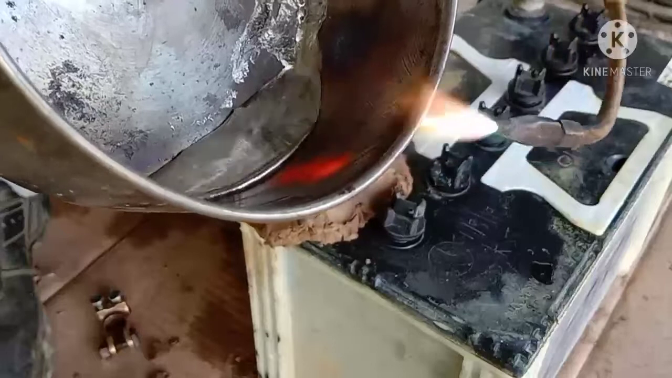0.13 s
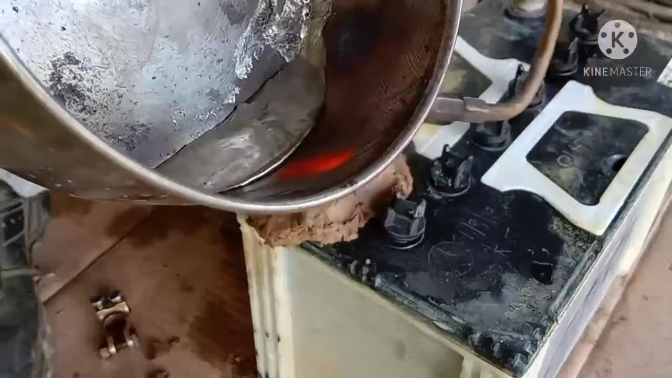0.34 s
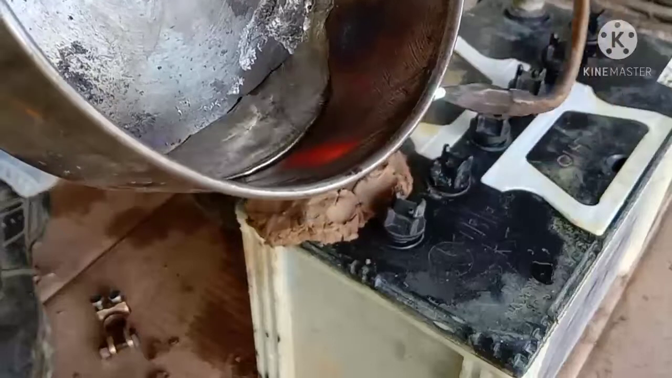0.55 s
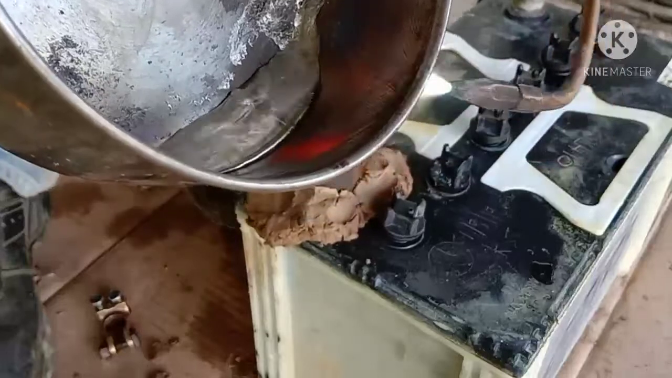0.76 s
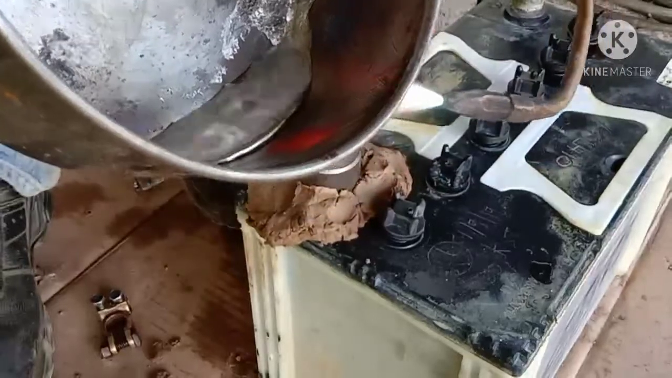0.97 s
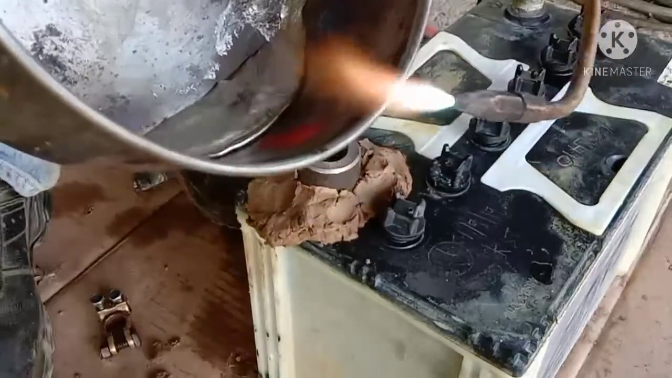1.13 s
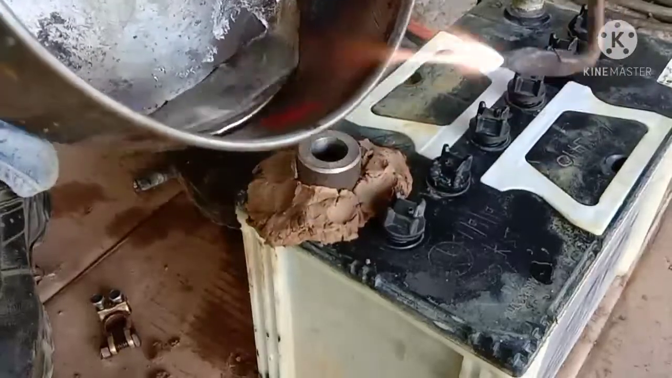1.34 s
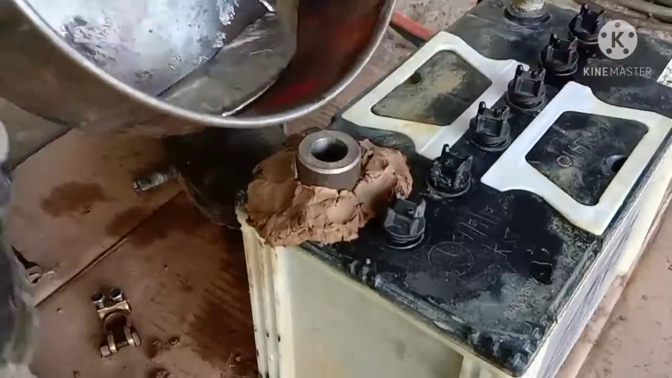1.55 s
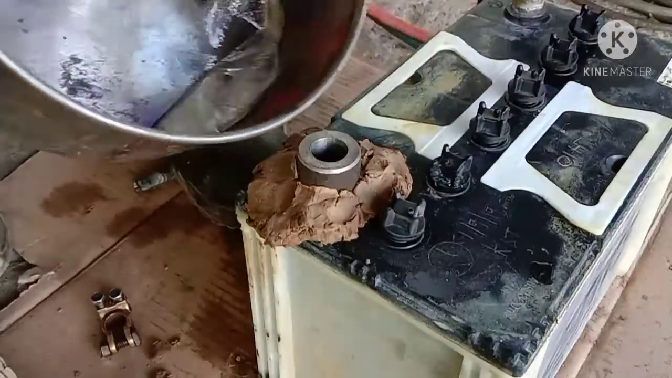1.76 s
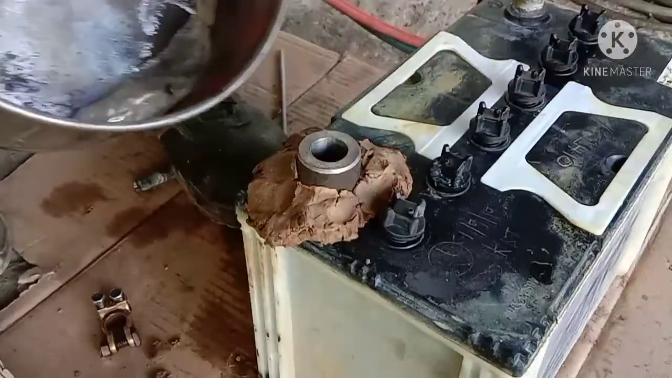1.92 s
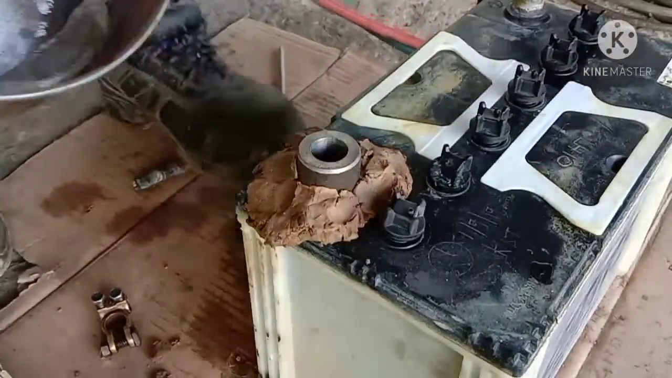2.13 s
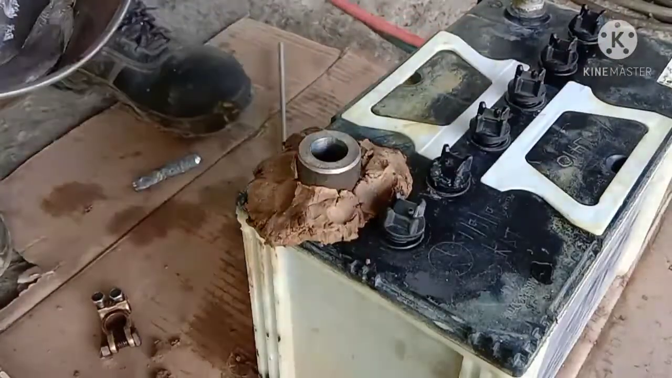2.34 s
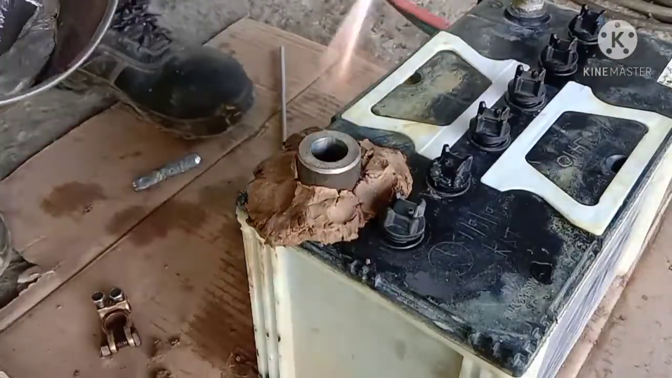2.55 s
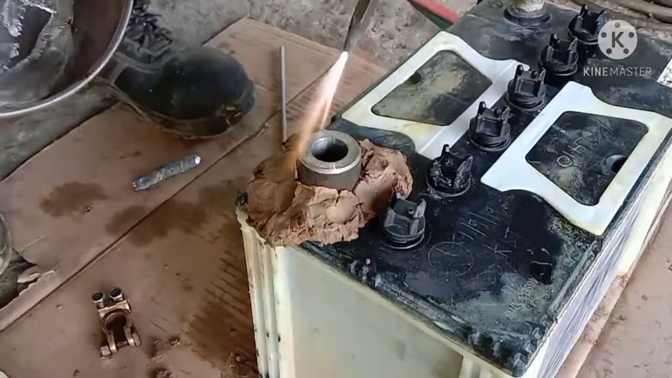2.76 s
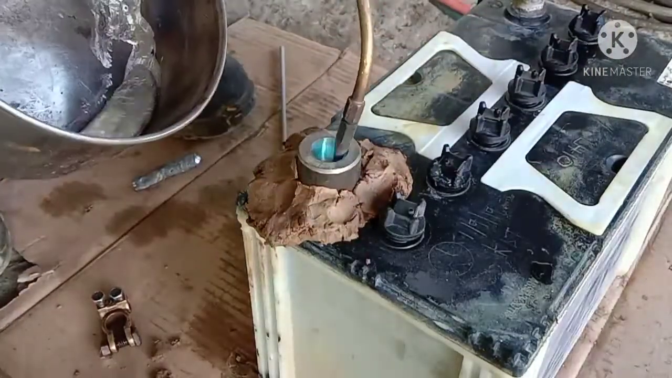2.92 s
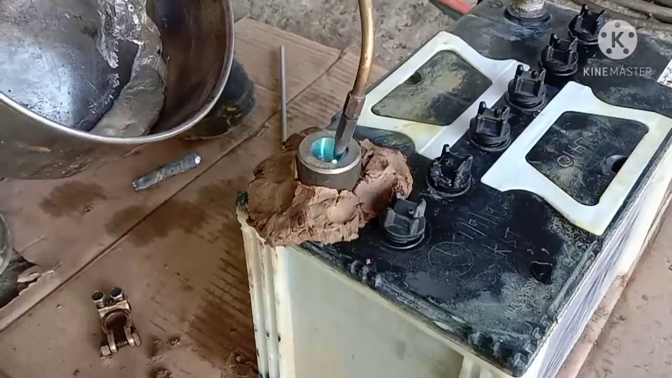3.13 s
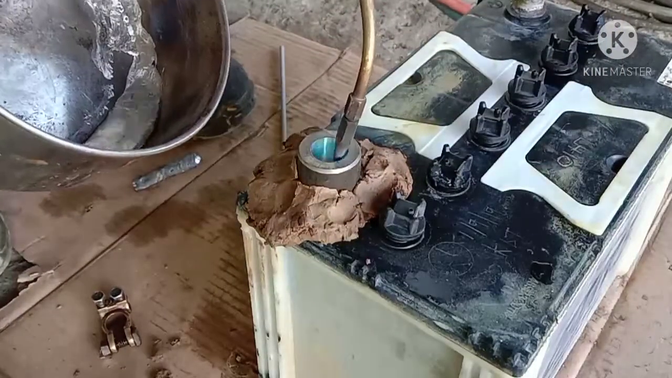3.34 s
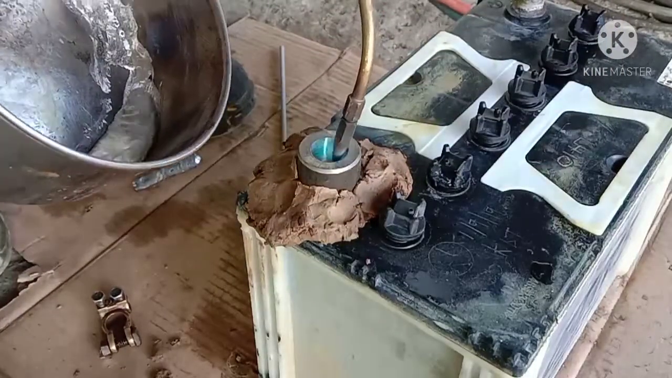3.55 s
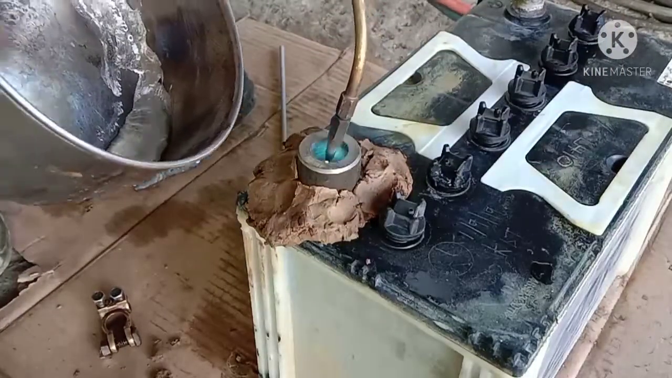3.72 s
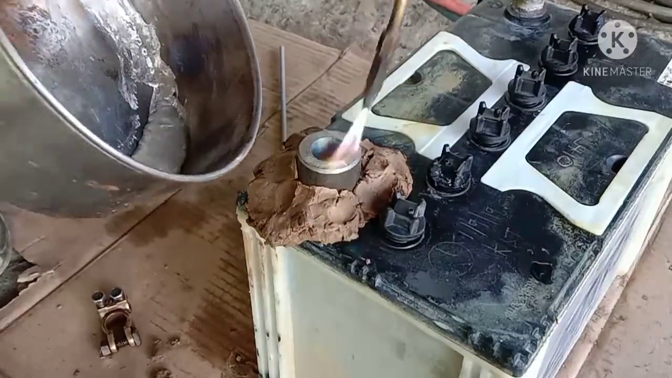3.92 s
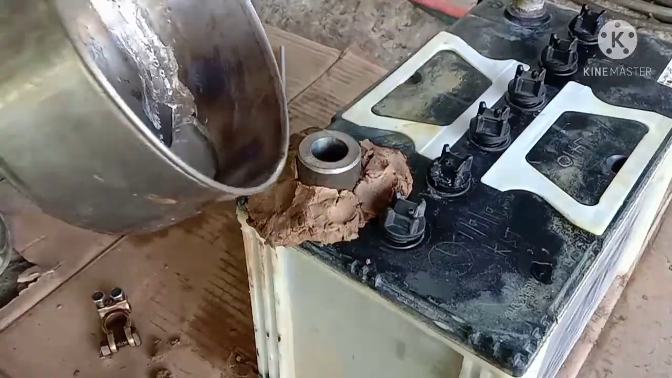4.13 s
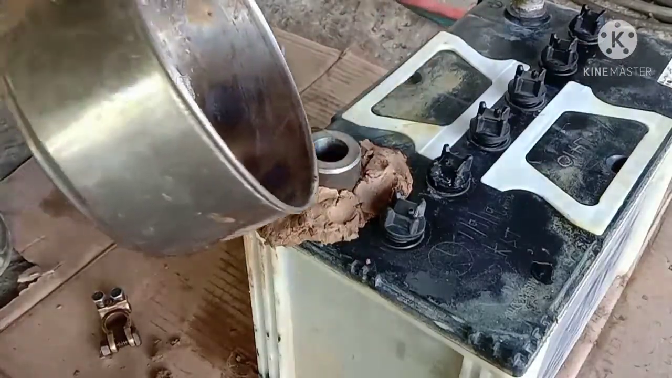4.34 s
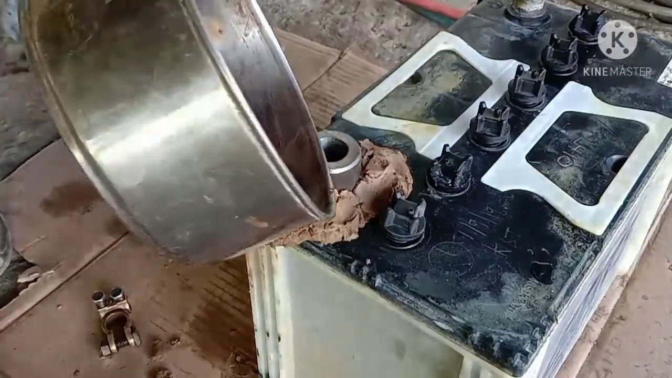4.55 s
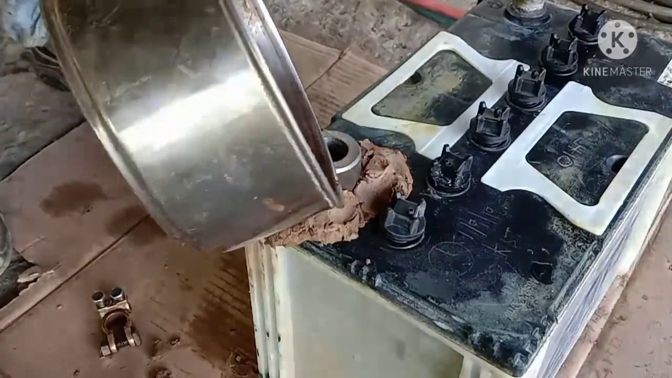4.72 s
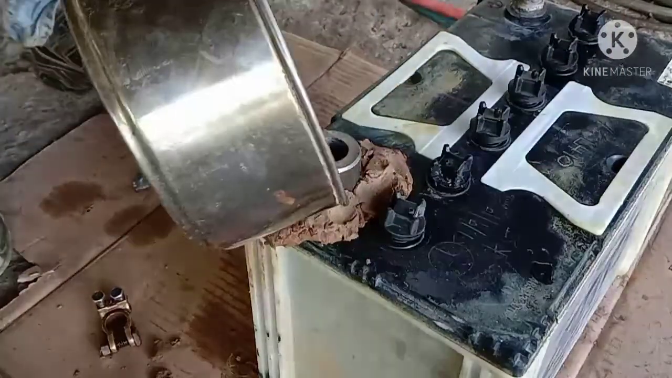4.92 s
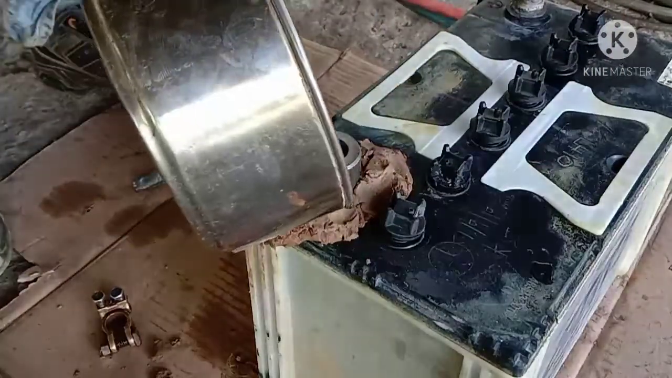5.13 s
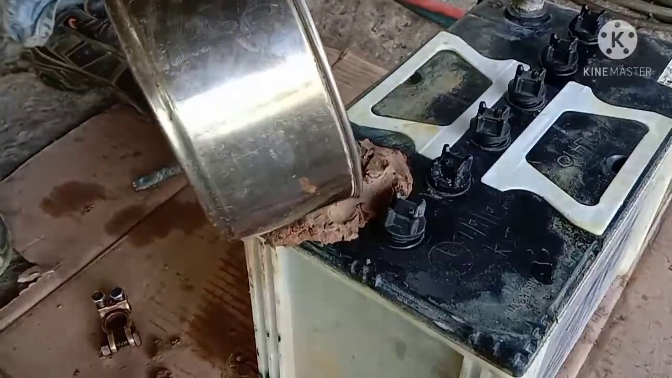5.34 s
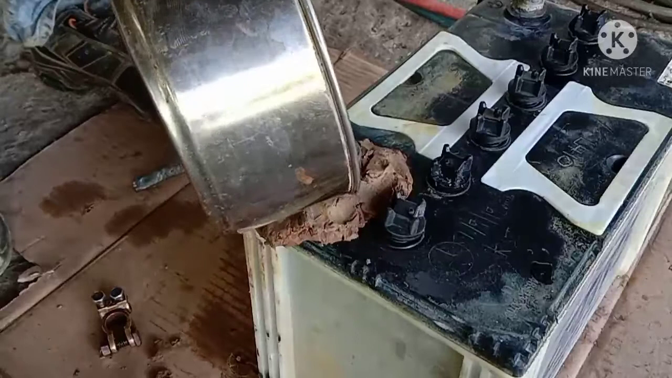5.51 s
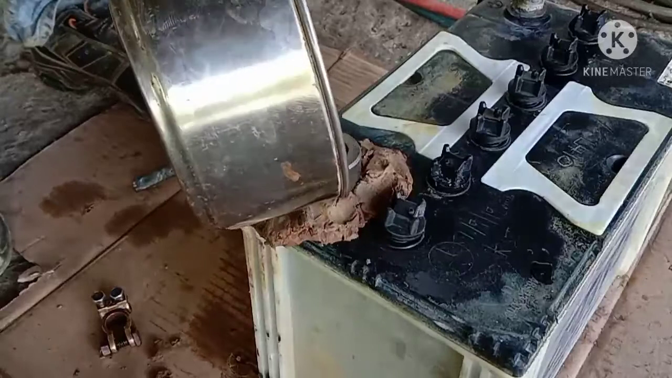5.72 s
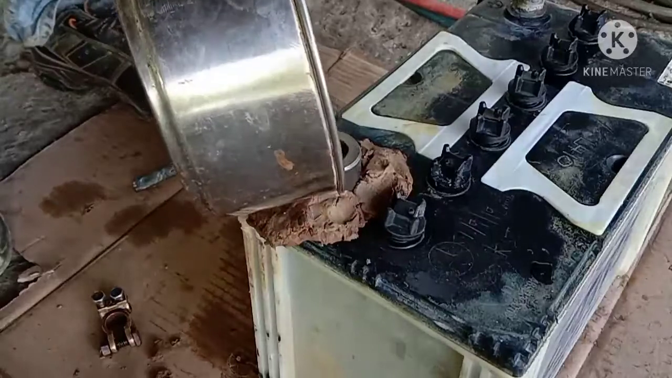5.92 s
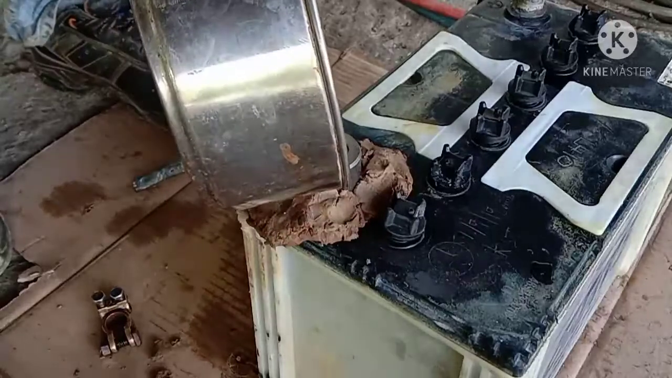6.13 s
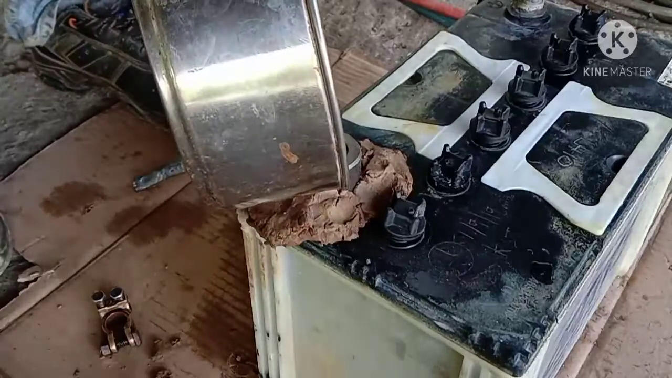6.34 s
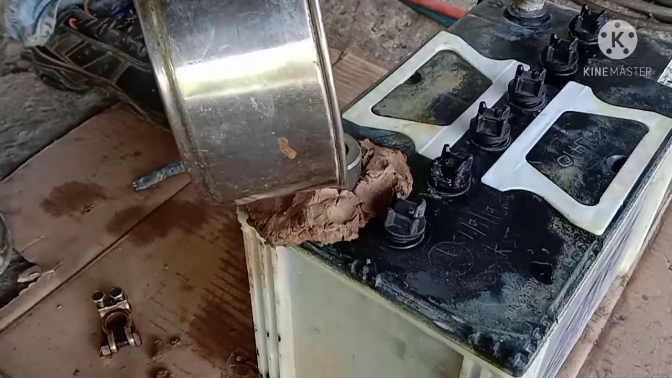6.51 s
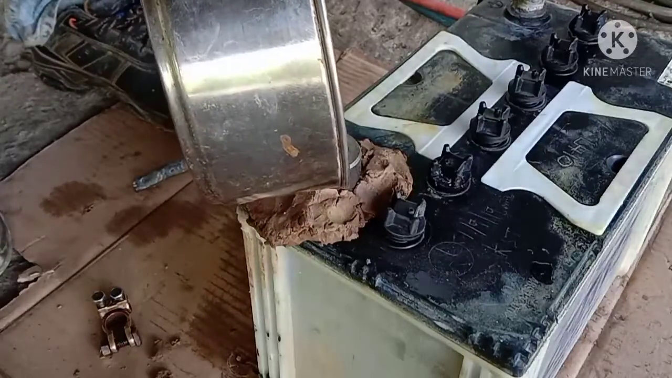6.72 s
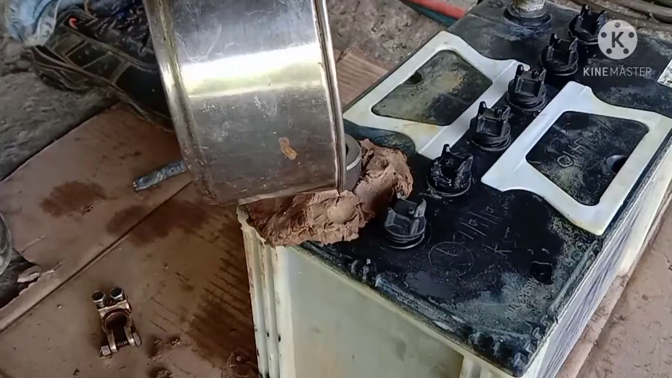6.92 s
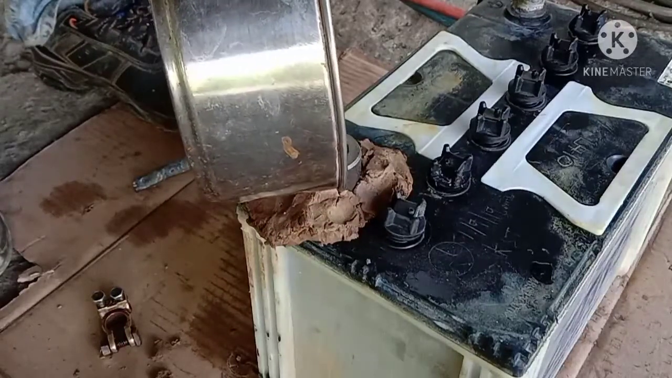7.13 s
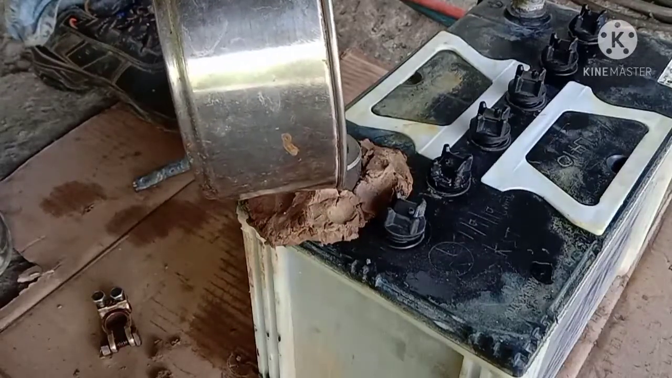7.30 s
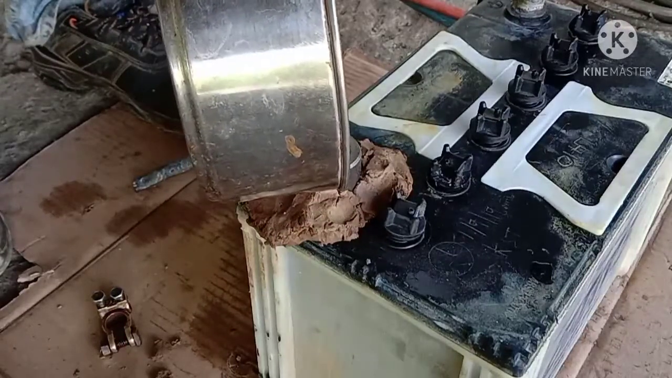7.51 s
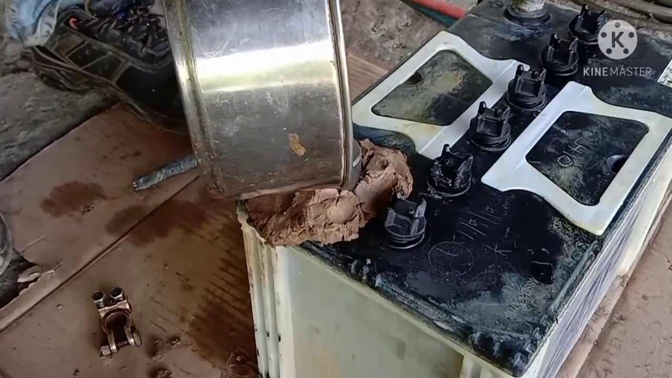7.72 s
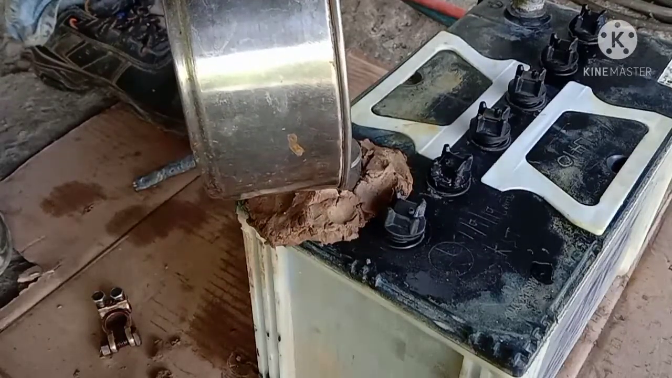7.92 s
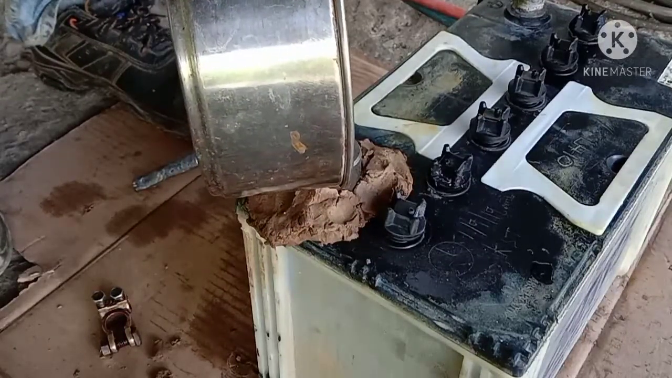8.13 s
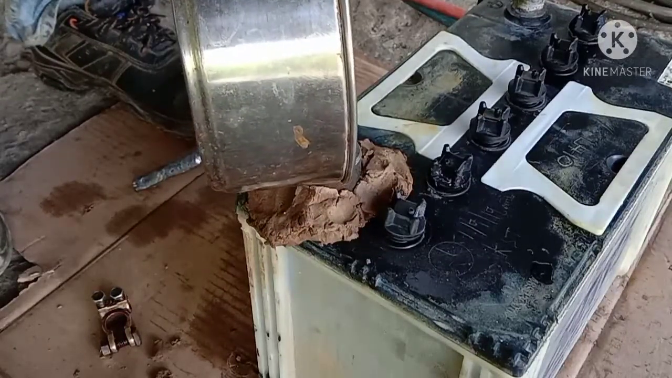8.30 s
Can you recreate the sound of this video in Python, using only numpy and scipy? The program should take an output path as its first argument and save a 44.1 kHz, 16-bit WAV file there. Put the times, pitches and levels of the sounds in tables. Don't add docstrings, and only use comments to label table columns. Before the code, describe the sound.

A bright, pitched gas torch hiss runs throughout, close to a mono microphone outdoors, with metallic ringing and a moving, flanging comb. From 0 to 1.7 s it swells and dips as the flame swings; a low roar licks at 0.2, puffs at 0.8, then burns turbulently from 1.1 to 2.2 and again to 2.5. Dull knocks come at 1.85, with a hard rattling cluster at 2.3-2.5. Soft flame spits flick by from 2.5 to 2.95. From about 2.9 to 4.05 the jet howls hollowly inside a mould, surging and shifting pitch, its top end shaded, with small metal knocks around 3.5, 3.7 and 4.0. A fading roar at 4-4.3 marks its exit. The hiss then steadies, thin and tinny, slowly changing colour. A faint tap comes at 6.2, a far thin hinge squeak in two swells at 7.1-7.4, soft cloth rubs at 7.4 and 7.7, and a low wind thump near 8.3.

```python
import sys
import numpy as np
from scipy import signal
from scipy.io import wavfile
from scipy.ndimage import uniform_filter1d

SR = 44100
rng = np.random.default_rng(int(sys.argv[2]) if len(sys.argv) > 2 else 0)


def voltage_ratio(level):
    return 10 ** (np.asarray(level, float) / 20)


def store_wav(level_fs):
    pcm = np.round(np.clip(np.atleast_2d(level_fs), -1, 1) * 32767)
    wavfile.write(sys.argv[1], SR, pcm.T.astype(np.int16))


N = 368676
SLOW_FADE_DB_PER_S = 300


def evened(x):
    return x / np.sqrt(np.mean(x ** 2) + 1e-20)


def columns(rows, t):
    s, *rest = np.transpose(rows)
    return [np.interp(t, s, c) for c in rest]


def frame_grid(size):
    frame_s = np.arange(N // (size // 4) + 5) * (size // 4) / SR
    return frame_s, np.fft.rfftfreq(size, 1 / SR)[:, None]


def noise(magnitude):
    size = 2 * (len(magnitude) - 1)
    a, b = rng.standard_normal((magnitude.shape[1], len(magnitude), 2)).T
    overlap_gain = np.sqrt(3 / 2)
    spectra = magnitude * (a + 1j * b)
    return overlap_gain * signal.istft(spectra, nperseg=size, noverlap=size * 3 // 4)[1][:N]


def in_band(shape, hz, lo_hz, hi_hz):
    inside = (hz > lo_hz) & (hz < hi_hz)
    return shape / np.sqrt((shape ** 2 * inside).sum(0))


def peaks(modes, hz):
    return np.sqrt(sum(voltage_ratio(2 * db) / (1 + (2 * (hz - f) / w) ** 2) for f, w, db in modes))


def slope(points, hz):
    f, db = np.transpose(points)
    return voltage_ratio(np.interp(np.log(hz + 1), np.log(f + 1), db))


def flicker(shape, size, depth_db):
    patches = rng.standard_normal(shape[::-1]).T
    smooth = uniform_filter1d(uniform_filter1d(patches, size[0], 0), size[1], 1)
    return voltage_ratio(depth_db * evened(smooth))


def swell(t, centre, half):
    return np.exp(-((t - centre) / half) ** 2)


def surging(t):
    # centre t/s, half length/s, level/dB, air column f/Hz, below 2 kHz rel. level/dB
    surges = [(2.944, 0.057, -47, 3240, 6), (3.028, 0.052, -42.5, 3420, 4), (3.096, .05, -40, 2080, 8),
              (3.165, 0.1, -42, 2800, 12), (3.28, 0.13, -38.5, 2440, 5), (3.441, .04, -37, 2450, 6.5),
              (3.513, 0.039, -37, 2880, 15), (3.57, .03, -42, 3080, -33), (3.651, 0.078, -36, 2420, 3),
              (3.733, 0.071, -41.5, 2960, 8), (3.836, .03, -37, 3120, -3), (3.894, 0.043, -33, 3440, 4.5),
              (3.959, 0.023, -35.5, 2600, 17), (4.05, 0.066, -48, 1680, 12)]
    centre, half, db, pitch, deep_db = np.transpose(surges)[:, :, None]
    power = voltage_ratio(2 * db) * swell(t, centre, half) ** 2 + 1e-12
    total = power.sum(0)
    pitch_hz = (power * pitch).sum(0) / total
    return 10 * np.log10(total), pitch_hz, (power * deep_db).sum(0) / total


def hiss():
    # f/Hz, width/Hz, level/dB
    nozzle = [(1280, 230, -18), (2416, 136, -3.5), (3358, 158, -0.5), (4392, 170, -7.5), (4950, 130, -40),
              (5443, 167, 2), (6470, 233, -4.5), (7667, 215, -6.5), (8110, 270, -8), (8740, 170, -12.5),
              (10010, 77, 1.5), (11100, 280, -0.5), (11990, 210, 5.5), (12970, 130, 4.5), (12500, 140, -2),
              (13800, 88, -1), (14590, 230, -1)]
    # t/s, f/Hz, level/dB
    hollow_ring = [(0, 1720, -10), (1.2, 1690, -11.5), (1.7, 1460, -6), (2.0, 1296, 5.5), (2.4, 1430, -1.5),
                   (4.4, 1490, -8), (5.0, 1370, -12), (5.7, 1520, -3.5), (8.36, 1560, 3.5)]
    # t/s, gain/dB
    aim = [(0, 0.5), (.29, 11), (.5, -3), (.71, 0.5), (.82, 8.5), (.98, -1), (1.1, 5), (1.2, 9),
           (1.37, 7.5), (1.54, 9), (1.68, 2), (2.35, 1.5), (2.5, 2.5), (3.0, 1), (3.95, 1), (4.22, 6.5),
           (4.5, -2.26), (8.36, -0.2)]
    # t/s, level/dB
    wash = [(0, -45), (1.2, -45.5), (1.75, -42.5), (2.4, -43.5), (2.8, -53), (4.2, -51.5), (5.1, -52.5),
            (5.7, -62.5), (8.36, -64)]
    # t/s, delay/ms, strength 0-1
    box_echo = [(.05, .46, 0.4), (.22, 0.52, 0.1), (.54, 0.41, 0.4), (.7, 0.5, 0.6), (.85, .5, 0),
                (.94, 0.383, 0.4), (1.08, 0.53, 0.5), (1.4, 0.57, 0), (1.85, .62, 0.58), (2.17, 0.72, 0.25),
                (2.58, 0.41, 0), (2.84, .2, .95), (4.02, .11, .95), (4.13, .18, .95), (4.36, 0.43, 0.47),
                (5.15, .37, 0.37), (5.55, 0.26, 0.5), (8.3, 0.23, 0.04)]
    # t/s, delay/ms, strength 0-1
    ground_echo = [(.05, 1.05, .55), (1.15, 1.06, .7), (1.65, 1.04, .4), (1.8, 1.55, .45), (1.95, 1.65, .7),
                   (2.2, 1.75, .45), (2.6, 1.36, .45), (2.82, 1.18, .65), (4.1, 1.2, .3), (4.3, 1.32, .5),
                   (4.75, 1.2, .85), (5.1, 1.165, .97), (5.58, 1.055, .93), (5.66, .985, .97),
                   (6.7, .96, .95), (8.3, .885, .92)]
    t, hz = frame_grid(size=1024)
    aim_db, low_db = columns(aim, t)[0], columns(wash, t)[0]

    enter_s, leave_s, hide_s = 3.05, 3.94, 0.04
    hidden = np.clip(np.minimum(t - enter_s, leave_s - t) / hide_s + 0.5, 0, 1)
    flame_off_db = -45.5
    cone_db = flame_off_db + 0.82 * aim_db + 0.11 * (low_db - wash[0][1])
    jet_db = -47.5 + 0.57 * aim_db
    shade_db = -7.5 - 0.52 * (surging(t)[0] - flame_off_db)
    top_db = -47 + aim_db + hidden * shade_db

    soften_hz, treble_echo = 6700, 0.09
    kept = treble_echo + (1 - treble_echo) / np.sqrt(1 + (hz / soften_hz) ** 14)
    box, ground = (1 + kept * share * np.exp(-2j * np.pi * hz * ms / 1000)
                   for ms, share in (columns(box_echo, t), columns(ground_echo, t)))
    comb = abs(box * ground)
    ring_hz, ring_db = columns(hollow_ring, t)
    hollow = voltage_ratio(ring_db) / (1 + (2 * (hz - ring_hz) / 330) ** 2)
    shape = np.hypot(peaks(nozzle, hz) * comb, hollow)

    bands_hz = [(1200, 2900), (3000, 7000), (6800, 9500), (9500, 15500)]
    level_db = np.array([low_db, cone_db, jet_db, top_db])
    own_db = np.array([20 * np.log10(shape[-1] / in_band(shape, hz, *band)[-1]) for band in bands_hz])
    place = np.interp(hz, [2400, 3300, 6300, 7400, 9000, 9900], [0, 1, 1, 2, 2, 3])
    blend = np.maximum(1 - abs(place - np.arange(len(bands_hz))), 0)
    low_cut = np.sqrt(1 + (1200 / (hz + 1)) ** 12)
    field = shape * voltage_ratio(blend @ (level_db - own_db)) / low_cut
    broad = flicker(field.shape, size=(220, 6), depth_db=0.32)
    return noise(field * broad * flicker(field.shape, size=(6, 10), depth_db=2.0))


def roar():
    # f/Hz, level/(dB per Hz)
    roar_shape = [(53, -41), (90, -46), (344, -5.5), (509, -6.5), (556, -5), (940, -7), (1080, -15.5),
                  (1160, -33), (1300, -23), (1690, -47), (2860, -120)]
    # start t/s, end t/s, start level/dB, end level/dB, start brightness/dB
    bursts = [
        (0.157, 0.312, -51.5, -43, 3),
        (0.816, 0.856, -51, -59, 0.5),
        (1.141, 1.682, -46.5, -45, 3.5),
        (1.722, 2.173, -47.5, -51, -1),
        (2.232, 2.54, -50, -48, -1),
        (2.58, 2.9, -57, -55.5, 2),
        (3.165, 3.19, -70, -65, -12),
        (3.27, 3.31, -64.5, -69, 17),
        (3.51, 3.524, -55, -57, -12),
        (3.95, 4.28, -52.5, -60, 5.5),
    ]
    snap_db_per_s, dull_db_per_s = 513, 18.5
    ember_db, roar_end_s = -78, 4.5
    t, hz = frame_grid(size=512)
    start, end, start_db, end_db, bright_db = np.transpose(bursts)[:, :, None]
    held = np.clip(t, start, end) - start
    level_db = start_db + (end_db - start_db) * held / (end - start)
    level_db = level_db - snap_db_per_s * np.maximum(start - t, 0)
    level_db = level_db - SLOW_FADE_DB_PER_S * np.maximum(t - end, 0)

    shape = slope(roar_shape, hz)
    share = np.clip((hz - 560) / 180, 0, 1)
    ember = voltage_ratio(2 * ember_db) * (t < roar_end_s)
    low = in_band(shape, hz, 200, 650) * np.sqrt(voltage_ratio(2 * level_db).sum(0) + ember)
    bright = voltage_ratio(2 * (level_db + bright_db - dull_db_per_s * held)).sum(0)
    high = in_band(shape, hz, 650, 1150) * np.sqrt(bright + ember)
    field = low * (1 - share) + high * share
    return noise(field * flicker(field.shape, size=(3, 9), depth_db=2.0))


def bore():
    # f/Hz, width/Hz, level/dB
    bore_modes = [(890, 19, 8), (1090, 35, -18), (2390, 410, 11.5), (3420, 310, -1), (4630, 350, 4),
                  (5570, 60, 6), (6800, 64, -3.5)]
    bright_db_per_khz, even_hz = 3.5, 2340
    t, hz = frame_grid(size=512)
    level_db, pitch_hz, deep_db = surging(t)
    bright_db = bright_db_per_khz * (pitch_hz - even_hz) / 1e3
    column = voltage_ratio(9.0) / (1 + (2 * (hz - pitch_hz) / 750) ** 2)
    deep = voltage_ratio(deep_db * np.clip((2100 - hz) / 500, 0, 1))
    band_limit = np.sqrt((1 + (800 / (hz + 1)) ** 8) * (1 + (hz / 6800) ** 10))
    shape = deep * np.hypot(peaks(bore_modes, hz), column) / band_limit

    low = in_band(shape, hz, 1000, 3240)
    high = in_band(shape, hz, 3360, 7000) * voltage_ratio(bright_db)
    share = np.clip((hz - 2700) / 600, 0, 1)
    field = (low * (1 - share) + high * share) * voltage_ratio(level_db)
    broad = flicker(field.shape, size=(90, 2), depth_db=0.8)
    return noise(field * broad * flicker(field.shape, size=(6, 10), depth_db=3.2))


def knocks():
    # t/s, peak level/dB, body f/Hz, rattle rel. level/dB, t60/s
    hits = [(1.845, -28.5, 530, -6, 0.023), (1.858, -28, 1446, 5.5, 0.039), (2.291, -33.5, 1165, 9.5, 0.13),
            (2.387, -19.5, 400, 8, 0.031), (2.392, -22, 1540, 3, 0.028), (2.401, -26.5, 1720, 0, 0.073),
            (2.414, -13, 1276, -2.5, 0.02), (2.426, -33, 1443, 2, 0.14), (2.443, -33.5, 814, -5, 0.14),
            (2.48, -20.5, 1050, -27, 0.028), (2.497, -32.5, 1184, 6, 0.054), (2.849, -43, 788, -12, 0.14),
            (3.468, -33, 1090, 16.5, 0.054), (3.49, -39, 1340, 9, 0.046), (3.496, -26, 843, 1, 0.026),
            (3.515, -44, 1750, -13, 0.045), (3.53, -24, 890, 15, 0.011), (3.547, -36, 1590, -10, 0.08),
            (3.739, -33.5, 1600, 17, 0.019), (3.951, -37, 950, 1, 0.046), (4.069, -28.5, 850, -17, 0.041),
            (6.2, -52, 988, -9, 0.12)]
    out, t = np.zeros(N + SR), np.arange(SR // 5) / SR
    grit_band = signal.butter(3, [900, 7500], "band", fs=SR, output="sos")
    for s, db, hz, rattle_db, t60 in hits:
        grain = rng.standard_normal(len(t))
        grain_db = 4.4 * uniform_filter1d(rng.standard_normal(len(t)), 40) * np.sqrt(40)
        rattle = evened(signal.sosfilt(grit_band, grain * voltage_ratio(grain_db)))
        rattle = rattle * voltage_ratio(rattle_db - 14.0 - 60 * t / (5.2 * t60))
        partials = [(0.55, 0.24), (1, 0.83), (1.47, 0.3)]
        body = sum(g * np.sin(2 * np.pi * hz * r * t) for r, g in partials)
        attack = np.minimum(t / 0.0004, 1)
        out[round(s * SR):][:len(t)] += voltage_ratio(db) * (body * voltage_ratio(-60 * t / t60) + rattle) * attack
    return signal.sosfilt(signal.butter(3, 170, "high", fs=SR, output="sos"), out[:N])


def squeak():
    # centre t/s, level/dB, half length/s, f/Hz
    swells = [
        (7.099, -43.5, 0.02, 3026),
        (7.132, -36.5, 0.019, 3010),
        (7.181, -42, 0.032, 2990),
        (7.211, -44, 0.031, 2990),
        (7.245, -61, .02, 2950),
        (7.276, -39, 0.022, 3000),
        (7.335, -49, 0.031, 3016),
        (7.392, -55, 0.051, 2976),
        (7.477, -57.5, 0.069, 3020),
    ]
    t, out = np.arange(N) / SR, np.zeros(N)
    turns = np.cumsum(columns([(s, hz) for s, db, half, hz in swells], t)[0]) / SR
    for s, db, half, hz in swells:
        out += voltage_ratio(db) * np.cos(np.pi / 2 * np.clip((t - s) / (1.42 * half), -1, 1)) ** 2
    tone = np.sin(2 * np.pi * turns) + voltage_ratio(-28) * np.sin(4 * np.pi * turns)
    return np.sqrt(2) * out * tone


def rustle():
    # centre t/s, level/dB, half length/s, f/Hz
    puffs = [
        (2.5, -42, 0.019, 12500),
        (2.58, -47, .03, 12500),
        (2.683, -40.5, 0.02, 12500),
        (2.772, -43.5, 0.021, 12500),
        (2.847, -38, 0.013, 12500),
        (2.944, -48, 0.016, 12500),
        (4.64, -52, 0.051, 3500),
        (7.423, -48.5, 0.08, 4220),
        (7.73, -49, 0.046, 5640),
    ]
    t, hz = frame_grid(size=256)
    field = sum(voltage_ratio(db) * in_band(peaks([(f, 0.27 * f, 0)], hz) ** 2, hz, 0, SR) * swell(t, s, half)
                for s, db, half, f in puffs)
    return noise(field * flicker(field.shape, size=(40, 3), depth_db=3.5))


def wind():
    # centre t/s, half length/s, level/dB, 110-220 Hz rel. level/dB
    gust_rows = [(0.27, 0.054, -69, 8), (0.994, 0.023, -56, -31), (1.233, .04, -70, -7),
                 (1.55, 0.38, -90.5, 22.5), (1.867, 0.027, -58, 6.5), (2.424, 0.018, -62, 15),
                 (2.8, 0.13, -86, 22.5), (2.929, 0.036, -61, -7), (3.233, .15, -69, 1),
                 (3.6, 0.11, -55, -14), (3.78, 0.054, -68, 5), (4.07, 0.063, -59.5, 5),
                 (4.22, .1, -67, -16), (7.388, .11, -65.5, -19), (8.075, 0.049, -65.5, -30.5),
                 (8.255, 0.045, -43.5, -14.5), (8.36, 0.025, -44, -16)]
    # f/Hz, level/(dB per Hz)
    yard_shape = [(18, -19), (30, -13), (81, -33), (193, 6), (555, 1.5), (670, 7), (919, 5), (1200, 3),
                  (1300, 9), (1690, 28), (2860, -120)]
    yard_db, calm_db, calm_high_db = -72, -80.5, 0.5
    t, hz = frame_grid(size=2048)
    centre, half, db, high_db = np.transpose(gust_rows)[:, :, None]
    push = voltage_ratio(db) * swell(t, centre, half)
    low_push = push.sum(0) + voltage_ratio(calm_db)
    high_push = (push * voltage_ratio(high_db)).sum(0) + voltage_ratio(calm_db + calm_high_db)
    low = in_band(slope([(20, -34), (45, -4.0), (75, 6), (110, -3.5), (140, -57.0)], hz), hz, 35, 110)
    high = in_band(slope([(90, -50), (125, 15), (200, 10), (300, -8), (500, -64)], hz), hz, 110, 220)
    gusts = np.hypot(low * (hz < 400) * low_push, high * high_push)
    yard = in_band(slope(yard_shape, hz) * (hz < 1400), hz, 30, 860) * voltage_ratio(yard_db)
    return noise(np.hypot(gusts * flicker(gusts.shape, size=(3, 2), depth_db=-3.5), yard))


def scene():
    mono = hiss() + roar() + bore() + knocks() + squeak() + rustle() + wind()
    return np.array([mono, mono])


def low_pass(x):
    return signal.sosfilt(signal.butter(12, 16130, fs=SR, output="sos"), x)


def record(dry):
    self_noise_db, edge_hz = -61, 15540
    hissy = dry + voltage_ratio(self_noise_db) * evened(np.diff(rng.standard_normal(N + 2), n=2))
    limit = signal.firwin(511, edge_hz, window=("kaiser", 9), fs=SR)
    mix = signal.oaconvolve(hissy, limit[None], "same", axes=1)
    return low_pass(mix)


dry = scene()
out = record(dry)
store_wav(out)
```